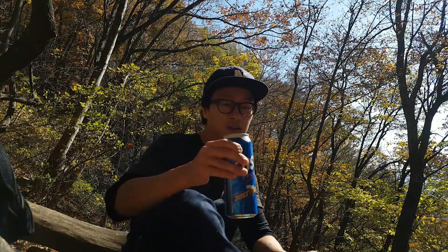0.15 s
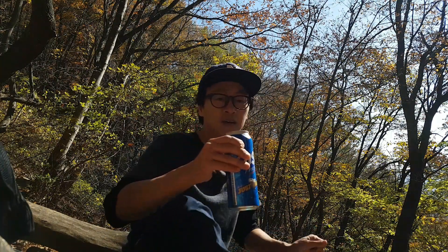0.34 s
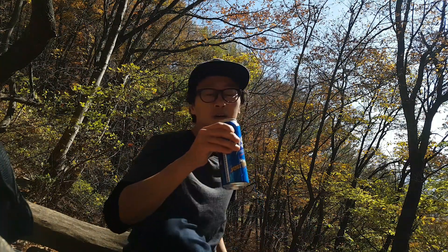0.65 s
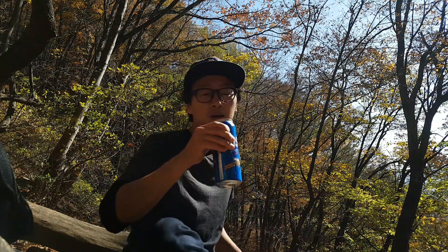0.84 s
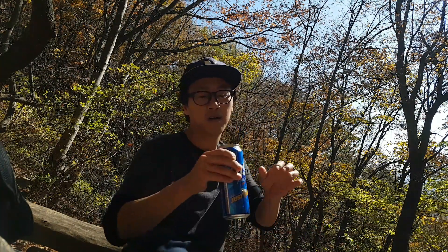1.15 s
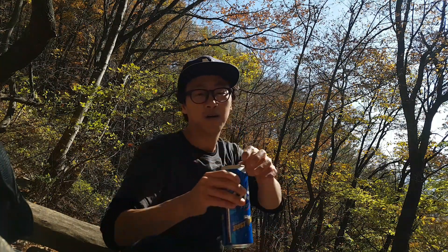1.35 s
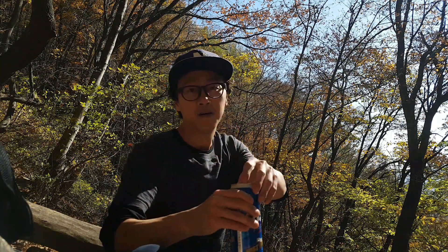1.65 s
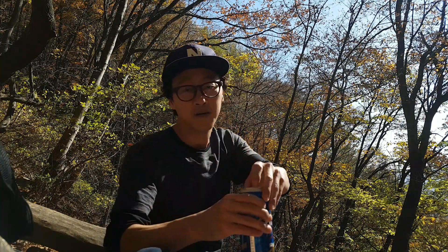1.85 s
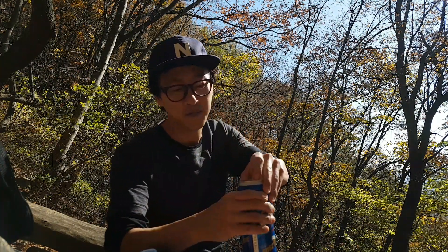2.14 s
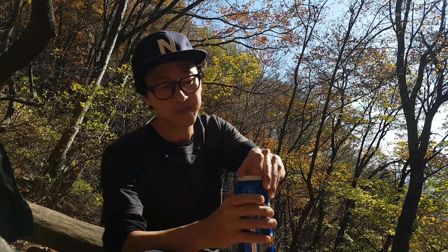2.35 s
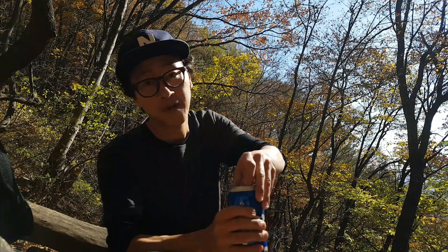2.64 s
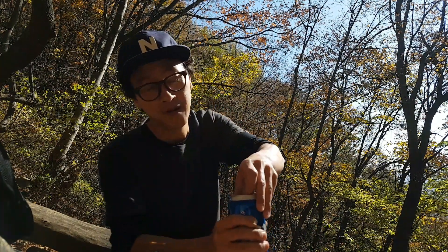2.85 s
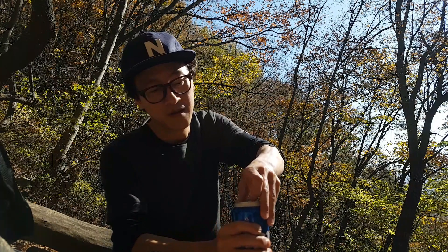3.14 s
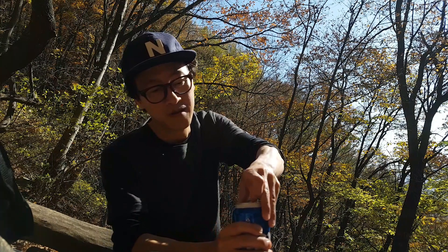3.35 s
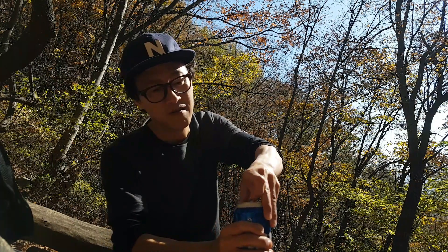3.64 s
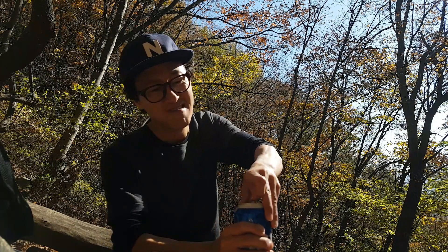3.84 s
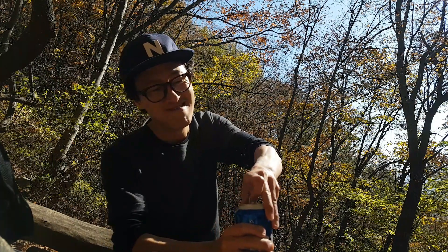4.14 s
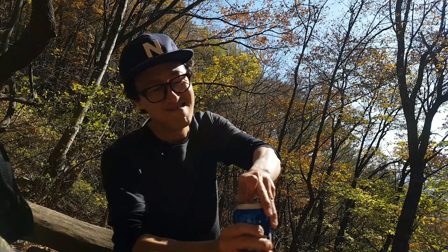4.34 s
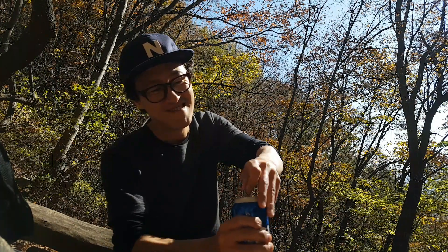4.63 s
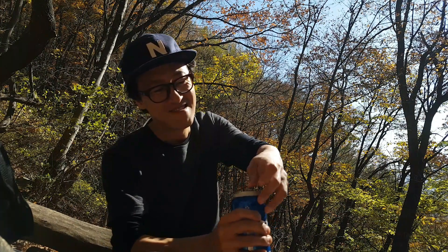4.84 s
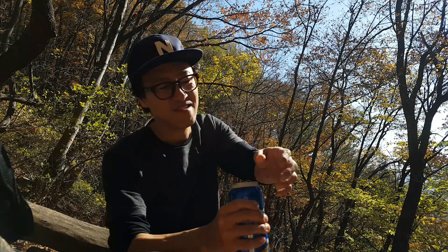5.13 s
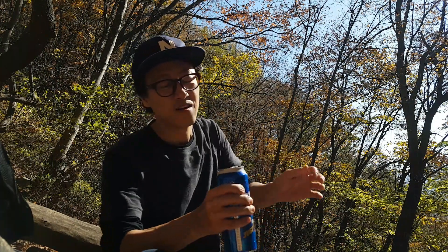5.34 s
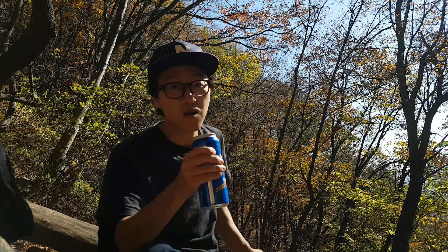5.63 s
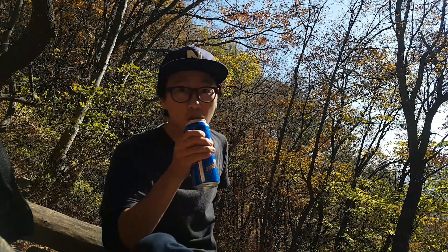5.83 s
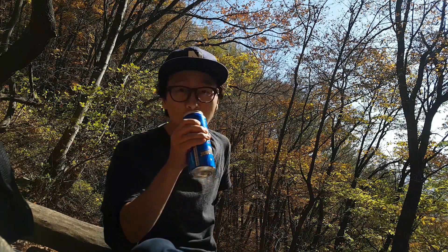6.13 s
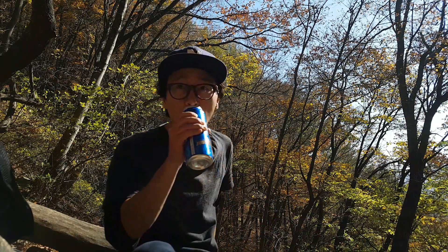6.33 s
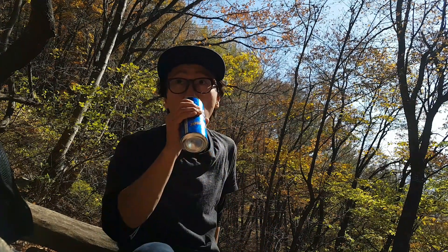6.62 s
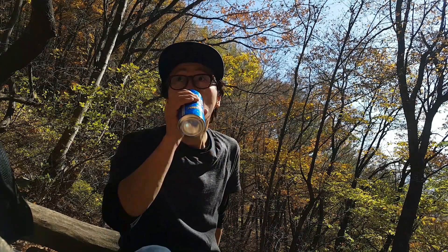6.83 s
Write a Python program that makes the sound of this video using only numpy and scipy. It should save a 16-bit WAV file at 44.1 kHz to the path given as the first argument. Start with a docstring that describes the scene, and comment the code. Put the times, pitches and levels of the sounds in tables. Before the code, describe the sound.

A soft, steady hush of woods lies under everything. In the first half second a shoe scuffs through dry leaves, followed by small crackles and light sleeve rustling until about 2.5 seconds. A faint metal tick comes at 1.9 seconds, and fingers knock lightly on a beer can at 2.2. The pull tab is pried and slips, giving sharp, short metallic clicks close by at about 3.0, 3.3 and 4.0 seconds. After a couple of tiny ticks, the lid cracks open at 4.2 seconds, by far the loudest sound, with a hollow pop and a spit of gas that fades within half a second. A thin echo scatters among the trees. The crack pushes the background hush down abruptly, and it creeps back only slowly. Very faint finger rubs and crackles come around 4.7 and 5 seconds, and again between 6 and 7 seconds.

```python
"""Opening a beer can in an autumn wood.

A man shifts his foot in dry leaves, then prises at the tab, which slips and snaps on the ringing lid.
The lid cracks open with a spit of gas that echoes among the trees.
The crack drives a limiter far down, and the hush of the wood creeps back."""
import sys
import numpy as np
from scipy import signal
from scipy.fft import rfft, irfft
from scipy.io import wavfile
from scipy.ndimage import uniform_filter1d, minimum_filter1d

SR = 44100
rng = np.random.default_rng(int(sys.argv[2]) if len(sys.argv) > 2 else 0)


def generate_wav(signal):
    """Clip the signal to [-1, 1] and save it as 16-bit WAV at the path in sys.argv[1]."""
    frames = np.transpose(np.atleast_2d(signal))
    scaled = np.clip(frames, -1, 1) * 32767
    pcm = np.round(scaled).astype(np.int16)
    wavfile.write(sys.argv[1], SR, pcm)


N = 307850
TIME = np.arange(N) / SR


def tab(wall_db=8.0, wall_t60_s=0.021, wall_low_hz=1400, spread_s=0.00054, jolt_db=10, jolt_s=0.00004):
    """Each snap is a jolt that flexes the lid, rings its modes and shakes the can's wall."""
    # Each row: start in seconds, level in dB, flexing mode in Hz, its relative dB, its t60 in seconds,
    # upper flexing mode in Hz, its relative dB, low-pass in Hz, ring time factor, place on the lid 0-1.
    snaps = [(1.9328, -38, 3300, 11, 0.013, 11000, 3, 12000, 1.2, .30),
             (2.9163, -53.5, 2200, 15, .006, 9600, 15, 14000, 1.4, .5),
             (2.9613, -20.5, 1472, 14.5, 0.009, 2850, 6.5, 5900, 0.85, .45),
             (3.3046, -16, 1720, 20.5, .0095, 4280, 1, 7200, 0.7, .21),
             (3.9611, -22, 4400, 0, .004, 7750, 5, 16980, 0.3, .4),
             (3.9626, -15, 1955, 6, .009, 7100, 7, 21040, 1.2, .53),
             (4.1090, -42.5, 1930, 7, .010, 9700, 0, 11030, 0.86, .7),
             (4.1614, -35.5, 2100, 10, .008, 10000, 6.5, 10000, 0.73, .45),
             (4.171, -39.5, 1700, 10.5, .007, 5012, 5, 10000, 0.63, .6),
             (4.1810, -22, 3300, 6, .006, 9900, 0, 12000, .7, .35),
             (4.1824, -2.5, 3340, 18.5, 0.0028, 10030, 6, 13900, 0.42, .28)]
    # Each row: frequency in Hz, relative level in dB, base t60 in seconds.
    lid_modes = [(667, -4.5, .016), (1250, -4, 0.0059), (1560, -6.5, 0.0053), (1850, -3.5, 0.024),
                 (2220, -3.5, 0.025), (2770, 0, .016), (3400, -3, 0.018), (3830, -0.5, 0.0076),
                 (4320, -2.5, 0.014), (5240, -0.5, 0.012), (5970, -1.5, 0.0062), (6300, -5.5, .014),
                 (7060, 0.5, 0.0091), (8240, -5, 0.011), (8490, -1, .02), (9330, -0.5, 0.012),
                 (9950, 0.5, 0.016), (11300, -3, .016), (11840, -4.5, 0.0095), (13250, -6.5, .014),
                 (14000, -8.5, .014), (13600, -2, .016)]
    out, t = np.zeros((2, N)), np.arange(SR // 12) / SR
    u = (t - spread_s / 2) / jolt_s
    jolt = gain_of(jolt_db) * u * np.exp(-u ** 2 / 2)
    crossing_s = spread_s * np.array([[1], [1.056]])  # the bend crosses the lid, aslant from the right
    wall_onset = 1 - np.exp(-(t / 0.001) ** 2)  # the wall answers later
    for start_s, db, flex_hz, flex_db, flex_t60_s, upper_hz, upper_db, bright_hz, ring, place in snaps:
        flex = mode(t, flex_hz, flex_db, flex_t60_s) + mode(t, upper_hz, upper_db, flex_t60_s)
        lid = np.zeros((2, len(t)))
        for k, (hz, mode_db, t60_s) in enumerate(lid_modes):
            age_s = np.maximum(t - crossing_s * k / len(lid_modes), 0)
            share = 1 + 0.5 * np.cos(np.pi * k * place)  # each place favours other modes
            lid += (-1) ** k * share * mode(age_s, hz, mode_db, t60_s * ring, rise_s=0.00005)
        wall_decay = gain_of(wall_db - 60 * t / (wall_t60_s * ring))
        wall = rng.standard_normal((2, len(t))) * wall_onset * wall_decay  # dense modes as noise
        snap = low_passed(jolt + lid + high_passed(wall, wall_low_hz), bright_hz) + flex
        # a smaller patch giving way is brighter and radiates less bass
        add(out, start_s, gain_of(db) * high_passed(snap, 0.054 * bright_hz, order=2))
    return out


def gas(open_s=4.182, rise_s=0.001, spit_db=-23, spit_t60_s=0.09, hiss_db=-35.5, hiss_t60_s=0.49):
    """Gas escapes through the crack: a quick spit, then a weaker hiss as the pressure runs out."""
    # Each row: frequency in Hz, relative level in dB.
    colour = [(200, -24), (1200, -8), (2300, 0), (3400, 4), (4600, -1.5), (7000, -7.5), (9700, 2.5),
              (12000, -5), (16000, -10.5)]
    age_s = np.maximum(TIME - open_s, 0)
    onset = 1 - np.exp(-age_s / rise_s)
    flow = gain_of(spit_db - 60 * age_s / spit_t60_s) + gain_of(hiss_db - 60 * age_s / hiss_t60_s)
    return onset * flow * diffuse(grains(per_s=16000, spread_db=0.0), colour)


def knocks():
    """Hands bump the can and the air inside pops as it opens, one damped mode each."""
    # Each row: start in seconds, level in dB, frequency in Hz, t60 in seconds.
    bumps = [(.5728, -36.5, 940, 0.021), (1.339, -27.5, 1920, 0.0067), (2.2257, -33, 432, 0.018),
             (2.2408, -42.5, 160, 0.17), (2.2454, -21.5, 1990, 0.015), (2.2515, -40, 507, 0.02),
             (4.1826, -11.5, 620, 0.03), (4.183, -27, 130, 0.025)]
    out, t = np.zeros((2, N)), np.arange(SR // 4) / SR
    for start_s, db, hz, t60_s in bumps:
        add(out, start_s, mode(t, hz, db, t60_s, rise_s=0.000708)[None])
    return out


def body_reflections(x):
    """The direct sound plus reflections off the man's hands, arm and chest."""
    # Each row: left delay in seconds, right delay in seconds, gain in dB.
    reflections = [(.00100, .00145, -17), (.00290, .00235, -14.5), (.0047, .0055, -23)]
    out = x.copy()
    for left_s, right_s, db in reflections:
        add(out, left_s, gain_of(db) * x * [[1], [0]])
        add(out, right_s, gain_of(db) * x * [[0], [1]])
    return out


def tree_echo(x, echo_db=-35, ground_db=-24, ground_s=0.0075):
    """A bounce off the leafy ground and a thin tail scattered by the trunks."""
    # Each row: frequency in Hz, relative level in dB.
    colour = [(200, -6), (700, -2), (1700, -3), (3300, 0), (6000, 0), (9500, -1.5), (15000, -5.5)]
    # Each row: frequency in Hz, t60 in seconds.
    decay_times = [(300, .7), (3300, 1), (6000, .42), (10000, 0.31), (15000, .3)]
    taps = rng.standard_normal((2, SR)) * (rng.random((2, SR)) < 0.1)
    hz, t, spectra = signal.stft(taps, SR, nperseg=256)
    shape_db = curve_at(colour, hz)[:, None] - 60 * t / curve_at(decay_times, hz)[:, None]
    response = signal.istft(spectra * gain_of(shape_db), SR, nperseg=256)[1]
    response *= gain_of(echo_db) / np.linalg.norm(response[0])
    bounce = rng.standard_normal((2, 128)) * np.hanning(128)
    add(response, ground_s, gain_of(ground_db) * bounce / np.linalg.norm(bounce[0]))
    return signal.fftconvolve(x, response, axes=1)[:, :N]


def scuffs():
    """Shoe, clothes and fingers rub in gritty strokes."""
    # Each row: peak time in seconds, level in dB, rise and fall constants in seconds, low-pass in Hz.
    strokes = [(.050, -41, 0.03, 0.018, 19000), (.097, -36.5, 0.0018, 0.011, 19000),
               (0.111, -32.5, 0.0089, 0.015, 19000), (0.139, -23, .010, 0.01, 19000),
               (.232, -39, .04, 0.039, 18000), (0.239, -29, 0.00053, 0.0034, 15000),
               (0.311, -47.5, 0.015, 0.011, 17000), (1.12, -46.5, 0.14, 0.18, 2270),
               (1.95, -48, 0.13, 0.15, 6000), (2.224, -36, 0.0022, 0.0057, 12000),
               (2.246, -32.5, 0.0043, 0.013, 3420), (2.784, -37, 0.0062, 0.0071, 1020),
               (4.69, -48, .004, .025, 6960), (5.02, -48.5, .015, 0.019, 6000)]
    # Each row: frequency in Hz, relative level in dB.
    colour = [(40, -12), (140, -11), (400, 0.5), (750, 0), (1500, -3.5), (3000, -6.5), (4500, -14),
              (7500, -18.5), (10500, -10), (13000, -14.5), (16000, -23.5)]
    grit = diffuse(grains(per_s=9000, spread_db=1.0), colour)
    out = np.zeros((2, N))
    for peak_s, db, rise_s, fall_s, bright_hz in strokes:
        from_peak = np.maximum((peak_s - TIME) / rise_s, (TIME - peak_s) / fall_s)
        envelope = np.exp(-np.minimum(from_peak, 20))
        out += gain_of(db) * envelope * low_passed(grit, bright_hz)
    return out


def crackles(log_half_width=0.42):
    """Leaves and fingertips crackle in brief bursts of band noise; the soft, longer bursts near 6.6 and 6.9 s
    are the man taking a sip."""
    # Each row: start in seconds, level in dB, centre in Hz, t60 in seconds.
    clear_crackles = [(0.0523, -33, 9700, 0.018), (.1363, -22, 2500, 0.0093), (0.2387, -31, 1560, 0.0063),
                      (.3412, -27.5, 10000, 0.0056), (.4045, -30, 12200, 0.0055), (.5123, -39, 1830, 0.011),
                      (.573, -34.5, 1600, .013), (0.6407, -40.5, 5950, 0.011), (0.7545, -42, 2350, 0.02),
                      (0.8276, -38, 11000, .01), (3.7923, -44.5, 3630, 0.043), (3.815, -43, 11300, .025),
                      (4.686, -44.5, 7950, .09), (5.0006, -46, 5000, .028), (6.1415, -43, 9960, .018),
                      (6.585, -52.5, 2500, .15), (6.93, -53, 2800, .1)]
    out, t = np.zeros((2, N)), np.arange(SR // 10) / SR
    for start_s, db, hz, t60_s in clear_crackles + faint_crackles():
        edges_hz = np.minimum(hz * np.exp([-log_half_width, log_half_width]), [SR / 3, SR / 2 - 100])
        band = signal.butter(2, edges_hz, "band", fs=SR, output="sos")
        burst = signal.sosfilt(band, rng.standard_normal((2, len(t))))
        add(out, start_s, unit_rms(burst) * gain_of(db - 60 * t / t60_s))
    return out


def faint_crackles(per_s=7, over_sleeves_db=9.5, spread_db=3, centre_hz=9000, t60_s=0.01):
    """Rows for crackles at random times, as strong as the arms are busy."""
    motion, rows = arm_motion(), []
    for when, size, pitch in rng.random((int(per_s * N / SR), 3)):
        db = 20 * np.log10(motion[int(when * N)]) + over_sleeves_db + spread_db * (2 * size - 1)
        rows.append((when * N / SR, db, centre_hz * 2 ** (pitch - 0.5), t60_s))
    return rows


def rustle(clump_db=2.5, leaves_db=-67):
    """Fine dry grains in clumps, from moving sleeves and the ever-stirring leaves overhead."""
    # Each row: frequency in Hz, relative level in dB.
    colour = [(300, -31), (1500, 1), (3500, -2), (7000, -8.5), (9000, -1), (11200, 2.5), (13000, -3),
              (16000, -8)]
    clumps = unit_rms(uniform_filter1d(rng.standard_normal(N), size=900))
    strength = np.hypot(arm_motion(), gain_of(leaves_db))
    grit = grains(per_s=3600, spread_db=-1.0) * gain_of(clump_db * clumps)
    return strength * diffuse(grit, colour)


def arm_motion():
    """Amplitude of the sleeve rustle: one smooth swell per movement."""
    # Each row: middle in seconds, level in dB, half length in seconds.
    moves = [(0.046, -50, 0.2), (0.605, -54.5, 0.21), (1.144, -56.5, 0.11), (1.56, -53, 0.17),
             (1.954, -49.5, .1), (2.45, -57, .4), (6.8, -64, 0.27)]
    power = sum(gain_of(2 * db) * np.exp(-np.minimum(((TIME - middle_s) / half_s) ** 2, 50))
                for middle_s, db, half_s in moves)
    return np.sqrt(power)


def hush(level_db=-49.5, patchy_db=1.0, waver_db=0.23):
    """The far, soft roar of the wood, steady but for drifting patches and a slight waver."""
    # Each row: frequency in Hz, relative spectral density in dB.
    colour = [(20, -10), (40, -14), (80, -8), (170, -6.3), (250, -4.8), (360, 0.2), (680, -.2), (1000, -5),
              (1400, -9.6), (2500, -13), (4000, -15.2), (6500, -22.8), (11000, -23.5), (15500, -23.5)]
    spectra = signal.stft(rng.standard_normal((2, N)), nperseg=1024)[2]
    patches = uniform_filter1d(rng.standard_normal(spectra.shape[1:]), size=8, axis=0)
    patches = unit_rms(uniform_filter1d(patches, size=10, axis=1))
    waver = unit_rms(uniform_filter1d(rng.standard_normal(spectra.shape[2]), size=40))
    air = signal.istft(spectra * gain_of(patchy_db * patches + waver_db * waver), nperseg=1024)[1]
    return gain_of(level_db) * diffuse(air[:, :N], colour)


def diffuse(pair, colour):
    """Colours two noises, at rms 1; long waves reach both sides more alike."""
    # Each row: frequency in Hz, left-right coherence 0-1.
    coherence = [(60, .78), (290, .55), (640, .6), (1400, 0.3), (3000, 0.11), (15000, 0.16)]
    hz = np.fft.rfftfreq(N, 1 / SR)
    a, b = rfft(pair)
    alike = np.clip(curve_at(coherence, hz), -1, 1)
    mid, side = a * np.sqrt(1 + alike), b * np.sqrt(1 - alike)
    return unit_rms(irfft(np.array([mid + side, mid - side]) * gain_of(curve_at(colour, hz)), N))


def grains(per_s, spread_db):
    """Two random impulse trains; spread_db boosts a few impulses, or cuts them if negative."""
    size = gain_of(spread_db * np.minimum(rng.exponential(1, (2, N)), 4))
    return rng.standard_normal((2, N)) * size * (rng.random((2, N)) < per_s / SR)


def mode(t, hz, db, t60_s, rise_s=0.00018):
    """One damped vibration with a quick rise."""
    return gain_of(db - 60 * t / t60_s) * (1 - np.exp(-t / rise_s)) * np.sin(2 * np.pi * hz * t)


def low_passed(x, hz):
    """Second-order low-pass."""
    return signal.sosfilt(signal.butter(2, min(hz, 0.45 * SR), fs=SR, output="sos"), x)


def high_passed(x, hz, order=1):
    """Butterworth high-pass."""
    return signal.sosfilt(signal.butter(order, hz, "high", fs=SR, output="sos"), x)


def gain_of(db):
    """Decibels to amplitude."""
    return 10 ** (np.asarray(db) / 20)


def unit_rms(x):
    """Scales to rms 1."""
    return x / np.sqrt(np.mean(x ** 2) + 1e-20)


def curve_at(points, hz):
    """Interpolates (Hz, value) points on a log-frequency axis."""
    point_hz, values = np.transpose(points)
    return np.interp(np.log(hz + 1), np.log(point_hz + 1), values)


def add(mix, start_s, sound):
    """Mixes a sound in at start_s."""
    part = mix[:, max(round(start_s * SR), 0):][:, :sound.shape[1]]
    part += sound[:, :part.shape[1]]


def scene():
    """The can and its echo over the small sounds of the man and the wood."""
    can = body_reflections(tab()) + gas()
    return can + tree_echo(can) + scuffs() + knocks() + rustle() + hush() + crackles()


def record(dry, recovery_db_per_s=1.0, hold_s=0.53, sink_share=0.52, sink_s=0.33, edge_hz=16200):
    """A look-ahead limiter drops at once, sinks further as it holds, recovers slowly; then a low-pass."""
    over_db = np.maximum(20 * np.log10(abs(dry).max(0) + 1e-9) + 0.3, 0)  # threshold -0.3 dB
    half_hold = int(hold_s * SR / 2)
    held_db = -minimum_filter1d(-over_db, 2 * half_hold + 1, origin=half_hold, mode="constant")
    recovery_db = recovery_db_per_s * TIME
    duck_db = np.maximum.accumulate(held_db + recovery_db) - recovery_db
    duck_db = uniform_filter1d(-minimum_filter1d(-duck_db, size=81), size=61)  # smooth look-ahead
    step = 1 / (sink_s * SR)
    duck_db += sink_share * signal.lfilter([step], [1, step - 1], held_db)
    low_pass = signal.firwin(255, edge_hz, window=("kaiser", 9), fs=SR)
    return signal.oaconvolve(dry * gain_of(-duck_db), low_pass[None], "same")


dry = scene()
out = record(dry)
generate_wav(out)
```